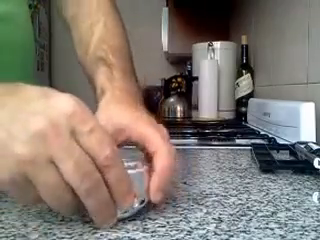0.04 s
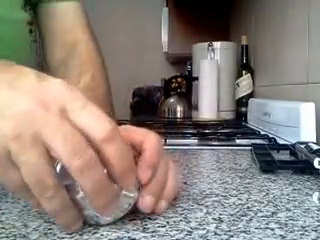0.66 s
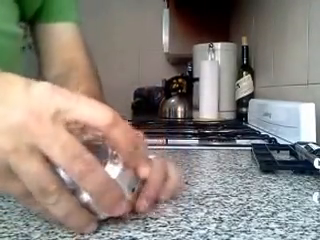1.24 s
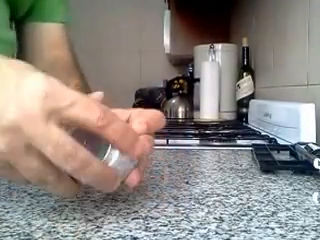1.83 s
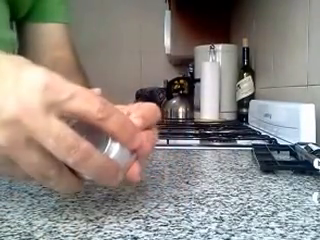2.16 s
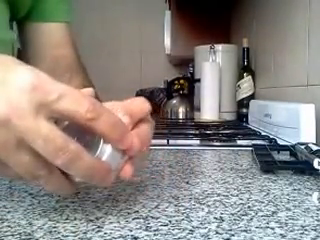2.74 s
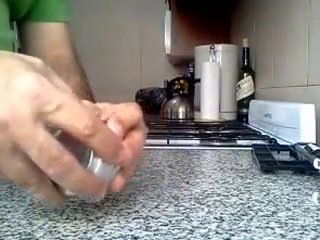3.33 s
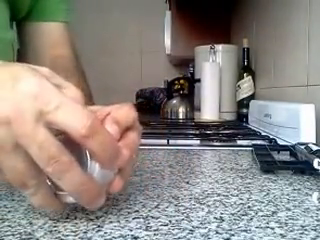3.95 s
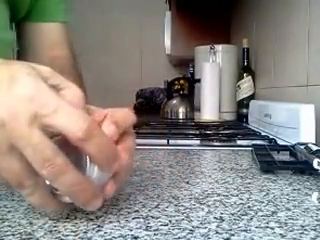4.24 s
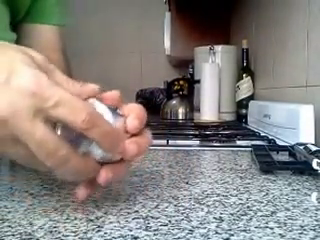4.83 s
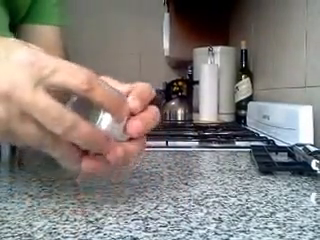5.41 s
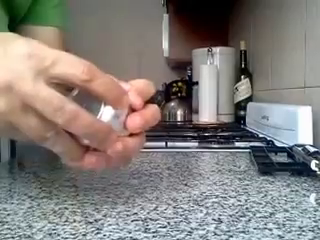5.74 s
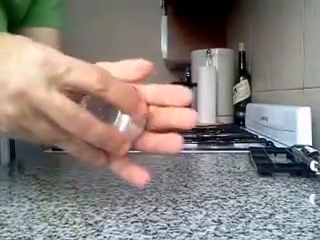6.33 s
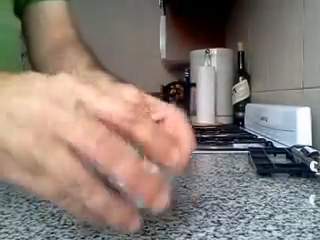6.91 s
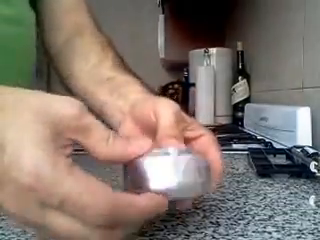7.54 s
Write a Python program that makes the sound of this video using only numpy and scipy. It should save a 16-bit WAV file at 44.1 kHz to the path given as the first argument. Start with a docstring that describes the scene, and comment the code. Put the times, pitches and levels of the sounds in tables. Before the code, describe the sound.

Two halves of a thin aluminium can are pressed and twisted together by hand. The metal ticks and crinkles in irregular clusters, broken by about five loud, sharp snaps. Between the clicks the rims scrape and the can rubs softly under the fingers, mostly in the second half. The small tiled kitchen rings briefly after each click, an appliance hums faintly, and the close microphone overloads on the snaps.

```python
"""A small tiled kitchen: over the counter, two halves of an aluminium drink can are twisted together.
The thin wall buckles patch by patch, ticking, crinkling and five times snapping loudly.
Between the clicks, stick-slip friction makes the rims scrape and the cup rub under the fingers.
The room rings after the clicks, an appliance hums, and the close microphone overloads on the snaps.
One very short, sharp, dry tick sounds at 1.86 s."""
import sys
import numpy as np
from scipy import signal
from scipy.fft import rfft, irfft
from scipy.io import wavfile
from scipy.ndimage import uniform_filter1d

SR = 44100
rng = np.random.default_rng(int(sys.argv[2]) if len(sys.argv) > 2 else 0)


def unload_audio(sound):
    """Save the sound as a 16-bit wav file, at the path given as the first command line argument."""
    columns = np.transpose(np.atleast_2d(sound))
    # keep every value between -1 and 1, then stretch to whole-number steps
    steps = np.round(np.clip(columns, -1, 1) * 32767)
    wavfile.write(sys.argv[1], SR, steps.astype(np.int16))


N = 333837
TIME = np.arange(N) / SR

# low, middle, upper and top band of a click: (lower f/Hz, upper f/Hz)
CLICK_BANDS = [(570, 1150), (1150, 2500), (2500, 5300), (5300, 7600)]
# usual mode of a wall patch in each of these bands: (f/Hz)
PATCH_HZ = [1166, 1399, 3082, 6300]


def crinkles(rooms, smear=0.053):
    """Direct and reverberant sound: clicks are detuned up and down on the outer room paths, so the echo is less
    pitched."""
    # buckles of the can, plus one very short, sharp, dry tick at 1.86 s: (t/s, level/dB, body/dB,
    # brightness/dB, leading mode f/Hz, after-ring/dB, decay T60/s, room/dB)
    clicks = [(-0.05, -17, -3.5, 1.5, 2960, -18, .04, -5), (0.2745, -33, -3.5, -0.5, 1700, -17, .04, -4),
              (0.3836, -45, 6.5, 3, 2800, -16, .02, 1), (0.456, -34, -5, -7, 860, -8, .03, 0),
              (0.6306, -47.5, -4, 0, 5000, -18, .025, -18), (0.7491, -26, -4, 0.5, 1100, -10, 0.069, -4.5),
              (0.9216, -16, -14, -1.5, 4000, -3, .032, -8.5),
              (0.9311, -17, -13.5, -9, 1665, -15, .069, -6.5),
              (1.0685, -18, -20, -5, 3170, -16, .063, -3.5), (1.079, -29, -8, 1, 1490, -9, .025, -2.5),
              (1.1039, -29, -5.5, 6, 1430, -19, .049, -4), (1.153, -17.5, -9, -2, 1470, -22, .074, -2.5),
              (1.161, -19, -10.5, -14.5, 2340, -14, .032, -11),
              (1.174, -19.5, -6.5, -16, 1204, -16, .048, -1.5), (1.44, -28.5, -7, -11, 1960, -13, .031, 2),
              (1.457, -22, -5.5, -2, 1990, -10, .046, -9), (1.481, -19, -8, -7.5, 4050, -21, .039, -4),
              (1.684, -30.5, -1.5, -4, 920, -20, 0.045, -1), (1.6892, -13.5, -13, -6.5, 5580, -9, .031, -5),
              (1.8624, -31.5, -22, 3, 2160, -49, 0.0037, -10.5),
              (2.0952, -32.5, -12, 2.5, 2990, -8, .043, -4), (2.3512, -41.5, 0.5, 1, 5300, -8, .032, -4),
              (2.435, -24, -9, -1, 4860, -10, .029, -5.5), (2.6449, -14, -5, 7, 902, -7, .037, -5),
              (2.783, -29, -2.5, -11, 1570, -23, .037, -1), (2.793, -22.5, -11.5, 6.5, 4490, -18, .052, -6),
              (3.2207, -8, -13, 7.5, 4250, -27, .033, -7),
              (4.0104, -24.5, -1, -13, 1275, -17.5, .025, -5.5),
              (4.0723, -35.5, -1.5, 14, 5560, -20, .01, -6.5), (4.305, -44, -1, 6, 723, -14, .025, 5),
              (4.3097, -31, -17, 13, 3670, -17, .025, -4.5), (4.431, -31, 5, 1, 750, -17, .02, 3),
              (4.446, -29.5, -4, -19, 764, -16, .027, -3), (4.468, -8, -4, 8, 1270, -11.5, .04, -11.5),
              (4.6025, -36, -17, 7, 6900, -16, .034, -18.5), (4.6236, -30.5, 0, -1, 1290, -17, .027, -19),
              (4.651, -28, -2, 0, 6900, -14, .048, -15), (4.658, -25, -3, 3.5, 1360, -15, .056, -11),
              (4.714, -24.5, -11.5, 0.5, 1326, -16, .044, -6),
              (4.788, -31.5, -19.5, 4, 1345, -15.5, .035, -4),
              (4.858, -33, -1, -5.5, 1380, -15, .025, -2.5), (4.9439, -9.5, -7.5, 4.5, 6755, -8, .034, -9),
              (5.033, -24, -11.5, -24, 1450, -8, .025, -19), (5.0706, -23, -3, -2, 1360, -22, .025, -3.5),
              (5.096, -31, -12, -4, 1320, -16, .025, -8), (5.1569, -24, -7.5, -5, 1066, -15.5, .025, -5),
              (5.3008, -25.5, 0, 5.5, 2990, -18.5, .025, -4.5),
              (5.427, -30.5, -3.5, 10.5, 7160, -25, 0.044, -10),
              (5.4312, -27.5, 0, 8, 3440, -14, 0.019, -4), (5.6272, -46.5, 6, 5, 810, -16, .029, -5.5),
              (5.7924, -20, 0.5, 16, 6510, -9, .04, -6.5),
              (6.4323, -23.5, -23, 3.5, 1423, -10.5, 0.027, -5.5),
              (6.638, -48.5, -8, 2, 4320, -20, 0.029, 1.5), (6.665, -46.5, -1, -1, 710, -17.5, 0.028, -0.5),
              (7.104, -62.5, 1, 14, 6960, -18, 0.028, -1), (7.138, -58, -4, 7.5, 7000, -18, .025, 2)]
    out = np.zeros(N)
    for start, level_db, body_db, bright_db, lead_hz, ring_db, t60, room_db in clicks:
        band_db, band_hz = patch_modes(level_db, body_db, bright_db, lead_hz)
        add(out, click(band_db, band_hz, t60, patch_db=-3), start)
        ring = after_ring(np.interp(lead_hz, band_hz, band_db) + ring_db, lead_hz)
        add(out, ring, start)
        add(out, undb(room_db) * signal.fftconvolve(ring, rooms[0]), start)
        for room, side in zip(rooms, np.linspace(-1, 1, len(rooms))):
            sideways = click(band_db, band_hz * (1 + smear * side), t60, patch_db=-10)
            add(out, undb(room_db) * signal.fftconvolve(sideways / np.sqrt(len(rooms)), room), start)
    return out


def patch_modes(level_db, body_db, bright_db, lead_hz, deep_hz=750, scatter=0.04, lead_db=2.7):
    """Plate modes: the size and shape of a patch set a level and a frequency in each band."""
    band_db = level_db + np.array([body_db, 0, 0.5 * bright_db - 0.5, bright_db])
    band_hz = np.array(PATCH_HZ, float)
    # the lowest mode sinks as the body of the cup joins in
    band_hz[0] = np.interp(body_db, [-5, 0], [PATCH_HZ[0], deep_hz])
    band_hz *= 1 + scatter * np.clip(rng.standard_normal(len(band_hz)), -2, 2)
    lead_band = sum(lead_hz > lo for lo, hi in CLICK_BANDS[1:])
    band_db[lead_band] += lead_db
    band_hz[lead_band] = lead_hz
    return band_db, band_hz


def click(band_db, band_hz, t60, patch_db, crack_s=0.0035, crack_db=3, width_hz=1000, far_db=-3):
    """Impulse excitation: a brief crack, the can's modes, and a wall patch's own more damped ones."""
    t = np.arange(SR // 25) / SR
    crack = rng.standard_normal(len(t)) * np.exp(-t / crack_s) * fade(t, 2 * t60)
    blow = unit(can_ring(t, t60)) + undb(crack_db) * unit(crack)
    out = 0
    for (lo, hi), db, hz in zip(CLICK_BANDS, band_db, band_hz):
        mode = np.sin(2 * np.pi * hz * t) * fade(t, 0.45 * t60)
        # wall modes near the patch's own are driven hardest
        near = signal.lfilter(*signal.iirpeak(hz, hz / width_hz, fs=SR), blow)
        wall = unit(band(near + undb(far_db) * blow, lo, hi))
        part = wall + undb(patch_db) * unit(band(mode, lo, hi))
        rms = np.sqrt(np.sum(part ** 2) / (0.01 * SR))  # as if all its energy fell within 10 ms
        out = out + undb(db) * part / rms
    return out


def can_ring(t, t60, split=0.045, spot_db=2.5, count=5):
    """Mode splitting: dents and grip make each mode a cluster; the struck spot sets weights and signs."""
    # modes of the hand-held can: (f/Hz, level/dB)
    can_modes = [(560, -9), (670, -12), (760, -1), (860, 7.5), (1080, -1.5), (1320, -5), (1480, 0.5),
                 (1660, -3.5), (1900, 1.5), (2140, 3), (2480, -20.5), (3050, -11.5), (3450, -5.5),
                 (3830, -3), (4100, -0.5), (4400, -9.5), (4970, -6.5), (5550, -2), (5950, -2), (6250, -1),
                 (6540, -3), (6900, 0.5)]
    hz, db = np.repeat(can_modes, count, axis=0).T
    detune, weight, sign = rng.standard_normal((3, len(hz)))
    gains = undb(db + spot_db * weight) * np.sign(sign)
    return gains @ np.sin(2 * np.pi * np.outer(hz * (1 + split * detune), t)) * fade(t, t60)


def after_ring(level_db, hz, t60=0.15):
    """Free decay: the leading mode rings on briefly after the click."""
    t = np.arange(SR // 4) / SR
    return undb(level_db) * np.sin(2 * np.pi * hz * t) * fade(t, t60)


def twisting(room, grit_db=1, sheen_db=-8, friction_db=-1, room_db=-3):
    """Friction: coarse slips drive the resonances of the cup while fine ones grate along the rim."""
    # resonances of the hollow cup under the fingers: (f/Hz, bandwidth/Hz, level/dB)
    cup_modes = [(537, 59, 1.5), (780, 76, 2), (1090, 58, -0.5), (1360, 70, 2.5), (1630, 200, -4.5),
                 (1890, 220, -1)]
    rub_gain, scrape_gain = effort()
    coarse = slips(per_second=420, spread_db=3)
    cup = sum((-1) ** k * undb(db) * band(coarse, hz - width / 2, hz + width / 2, order=1)
              for k, (hz, width, db) in enumerate(cup_modes))
    rub = unit(band(cup, 440, 2400, order=4))
    fine = slips(per_second=1300, spread_db=2)
    grit = undb(grit_db) * unit(band(fine, 2900, 9000))
    sheen = undb(sheen_db) * unit(band(fine, 6700, 9400, order=1))
    friction = rub * rub_gain + unit(grit + sheen) * scrape_gain
    direct = undb(friction_db) * friction + ticks(rub_gain, scrape_gain)
    return direct + undb(room_db) * signal.fftconvolve(direct, room)[:N]


def effort(attack_s=0.013, release_s=0.0053, hold_rub_db=-61.5, hold_scrape_db=-60, uneven_db=-0.5):
    """Envelopes of rub and scrape: each twist takes hold, goes on unevenly and lets go."""
    # twists of the halves: (start t/s, duration/s, rub level/dB, scrape level/dB)
    twists = [(0.082, 0.37, -51, -50), (0.446, 0.053, -42, -51.5), (0.55, 0.12, -56, -53),
              (0.664, 0.096, -40, -44.5), (0.806, 0.18, -53, -50), (1.19, 0.13, -53, -55),
              (1.325, 0.025, -37, -41), (1.381, .018, -32.5, -37.5), (1.527, 0.2, -47.5, -50),
              (1.738, 0.07, -43, -39), (2.89, 0.089, -45.5, -40.5), (3.04, 0.057, -50.5, -64),
              (3.656, .04, -47, -46.5), (3.791, 0.031, -44.5, -49), (3.863, 0.02, -64, -54),
              (4.323, 0.094, -34, -40), (4.553, 0.2, -37.5, -36), (4.989, 0.074, -37.5, -35),
              (5.157, .05, -48.5, -57), (5.737, 0.041, -45, -53.5), (6.017, .13, -39, -49),
              (6.222, 0.073, -34, -40.5), (6.328, 0.05, -30, -37), (6.455, 0.12, -34.5, -42),
              (6.511, 0.019, -36, -32.5), (6.799, 0.046, -47, -43), (7.047, .13, -67, -55),
              (7.224, 0.22, -66.5, -66)]
    gains = np.outer(undb([hold_rub_db, hold_scrape_db]), np.ones(N))  # fingers between twists
    for start, length, rub_db, scrape_db in twists:
        attack = np.clip((TIME - start) / attack_s, 0, 1)
        release = np.exp(-np.maximum(TIME - start - length, 0) / release_s)
        gains += np.outer(undb([rub_db, scrape_db]), attack * release)
    return gains * undb(uneven_db * walk(35))


def slips(per_second, spread_db):
    """Stick-slip: a Poisson train of impulses of random sign and size."""
    chance, size = rng.random(N), rng.standard_normal(N)
    return (chance < per_second / SR) * rng.choice([-1, 1], N) * undb(spread_db * np.clip(size, -2, 2))


def ticks(rub_gain, scrape_gain, count=70, scatter=0.038, tick_db=-2, spread_db=2):
    """Snap-through: tiny patches flip at random moments, as strongly as the halves are twisted."""
    out = np.zeros(N)
    onsets = rng.integers(0, N, count)
    for i, (size, pitch) in zip(onsets, np.clip(rng.standard_normal((count, 2)), -2, 2)):
        twist_db = 20 * np.log10(np.repeat([rub_gain[i], scrape_gain[i]], 2) + 1e-9)
        band_db = twist_db + tick_db + spread_db * size
        band_hz = np.array(PATCH_HZ) * (1 + scatter * pitch)
        add(out, click(band_db, band_hz, t60=0.025, patch_db=-3), i / SR)
    return out


def kitchen(build_s=0.001, wall_s=0.0063, wall_db=-13):
    """Reverberation: an impulse response with a diffuse tail and an early reflection off the near wall."""
    # decay of the room by band: (lower f/Hz, upper f/Hz, T60/s, level/dB)
    room_bands = [(203, 1205, 0.37, 5), (960, 2450, 0.52, -1), (2280, 4840, 0.42, 1), (4990, 7800, 0.41, 0)]
    t = np.arange(int(SR * 2 / 3)) / SR
    tail = sum(undb(db) * band(rng.standard_normal(len(t)), lo, hi) * fade(t, t60)
               for lo, hi, t60, db in room_bands)
    tail *= 1 - np.exp(-(t / build_s) ** 2)
    top_hz = room_bands[-1][1]
    tail /= np.sqrt(np.sum(tail ** 2) * SR / 2 / top_hz)  # mean power gain near 1 below top_hz
    tail[int(wall_s * SR)] += undb(wall_db)
    return tail


def room_air(level_db=-47.5, swell_db=-0.5):
    """Coloured noise: room air and microphone hiss at a nearly steady level."""
    # noise spectrum: (f/Hz, relative spectral level/dB)
    air_spectrum = [(20, -21), (35, -15), (70, -12), (100, -29), (150, -22), (250, -15), (340, -6),
                    (560, -6), (750, -8), (1100, -10), (1600, -15), (2600, -21), (4500, -25), (6800, -22)]
    hz, db = np.transpose(air_spectrum)
    bin_hz = np.maximum(np.arange(N // 2 + 1) * SR / N, 1)
    colour = undb(np.interp(np.log(bin_hz), np.log(hz), db))
    noise = irfft(rfft(rng.standard_normal(N)) * colour, N)
    return unit(noise) * undb(level_db + swell_db * walk(4.8))


def appliance_hum(gain_db=-1, waver_db=2, waver_rad=1.3):
    """Amplitude and phase modulation: the tones of an appliance waver at random."""
    # partials of the hum: (f/Hz, relative level/dB)
    partials = [(355.3, -60), (403.7, -58), (441.4, -55.5), (608.3, -81), (651.4, -63), (936.7, -69),
                (1034, -56), (1211, -70.5)]
    hum = np.zeros(N)
    for hz, db in partials:
        amplitude = np.sqrt(2) * undb(db + waver_db * walk(7.8))
        hum += amplitude * np.sin(2 * np.pi * hz * TIME + waver_rad * walk(12))
    return undb(gain_db) * hum


def undb(db):
    """Decibels to amplitude ratio."""
    return 10 ** (np.asarray(db) / 20)


def unit(x):
    """Scale to rms 1."""
    return x / np.sqrt(np.mean(x ** 2))


def band(x, lo, hi, order=3):
    """Causal band-pass from lo to hi in Hz."""
    return signal.sosfilt(signal.butter(order, [lo, hi], "band", fs=SR, output="sos"), x)


def add(out, x, start_s):
    """Superposition: mix x into out from start_s on."""
    i = int(round(start_s * SR))
    x, i = x[max(-i, 0):], max(i, 0)
    out[i:i + len(x)] += x[:N - i]


def walk(rate_hz):
    """Smoothed random steps with a spread near 1."""
    span = max(int(SR / rate_hz), 1)
    steps = np.repeat(rng.standard_normal(N // span + 1), span)
    return 1.5 * uniform_filter1d(uniform_filter1d(steps, span), span)[:N]


def fade(t, t60):
    """Exponential decay by 60 dB in t60."""
    return np.exp(-np.log(1000) * t / t60)


def scene(paths=3):
    """Superposition: the can, heard directly and along a few room paths, over air and hum."""
    rooms = [kitchen() for _ in range(paths)]
    return (crinkles(rooms) + twisting(rooms[0]) + room_air() + appliance_hum())[None]


def record(dry, ceiling=1.18, trough=1.1, mic_hz=7320, top_hz=16000):
    """Asymmetric clipping: a narrow-band microphone overloads unevenly, which thumps."""
    overloaded = np.clip(dry, -trough, ceiling)
    lowpass = signal.firwin(201, mic_hz, fs=SR)
    narrow = signal.fftconvolve(overloaded, lowpass[None], "same")
    heard = np.clip(narrow, -1, 1)  # the peaks and the filter's overshoot clip again at full scale
    return signal.sosfilt(signal.ellip(8, .2, 85, top_hz, fs=SR, output="sos"), heard)


dry = scene()
out = record(dry)
unload_audio(out)
```